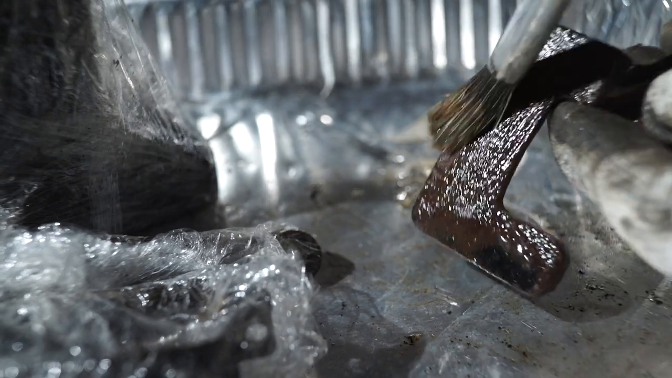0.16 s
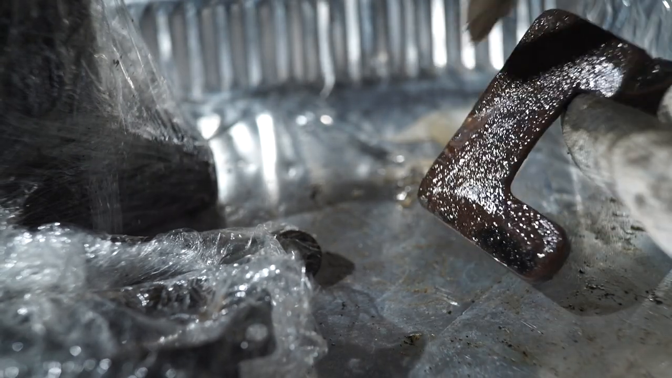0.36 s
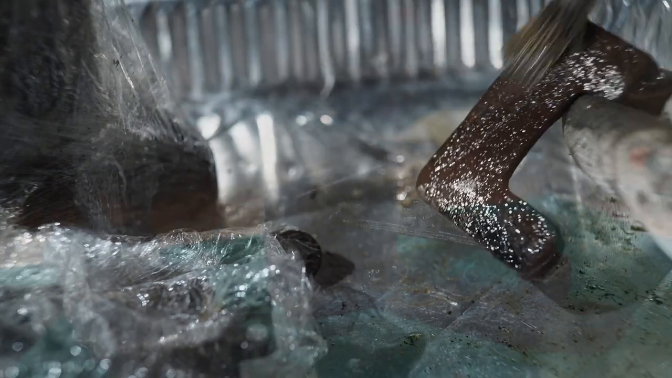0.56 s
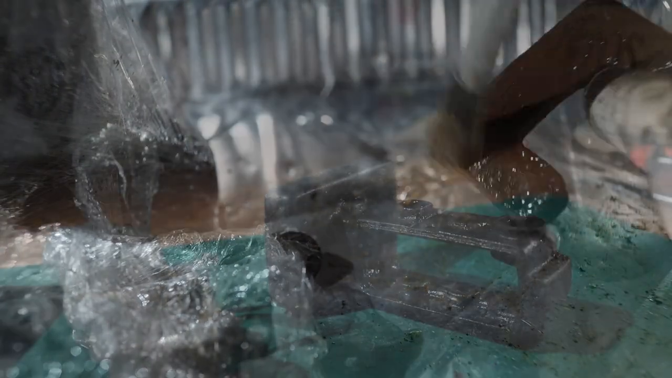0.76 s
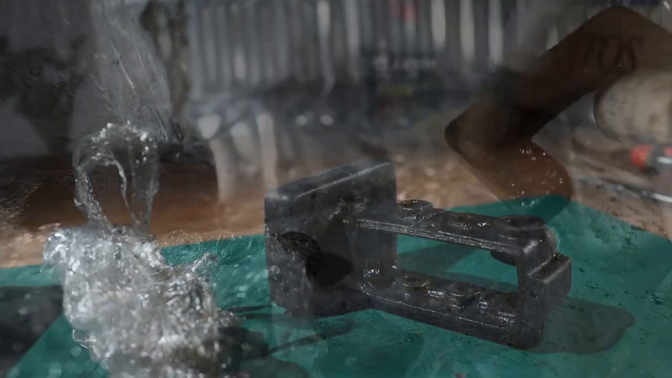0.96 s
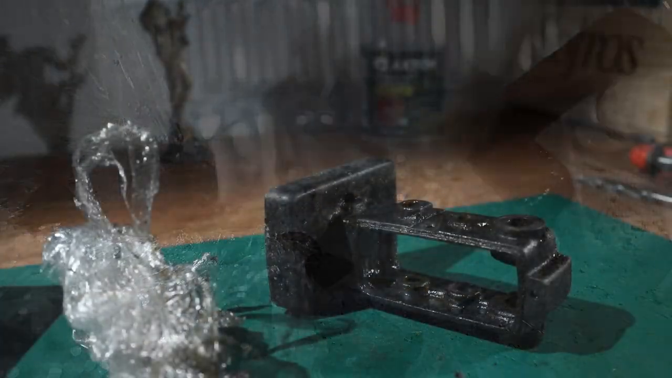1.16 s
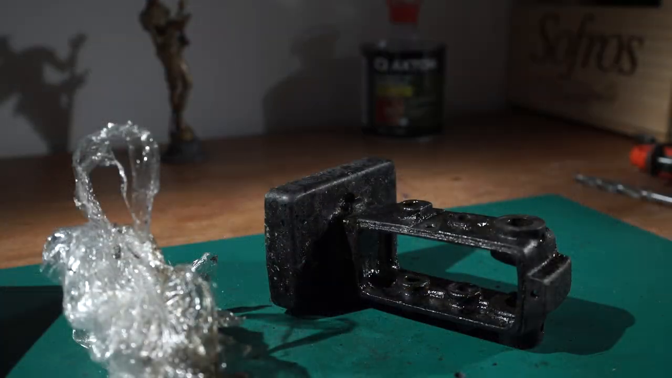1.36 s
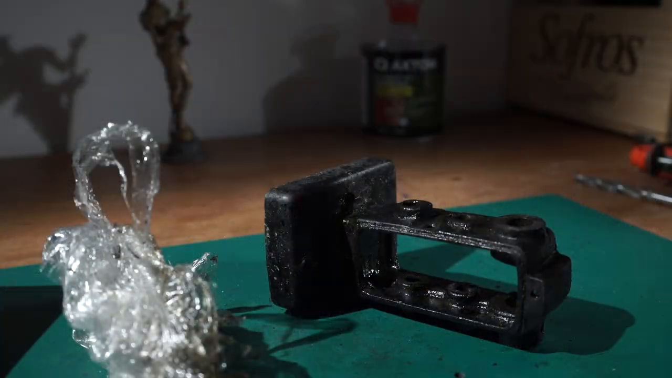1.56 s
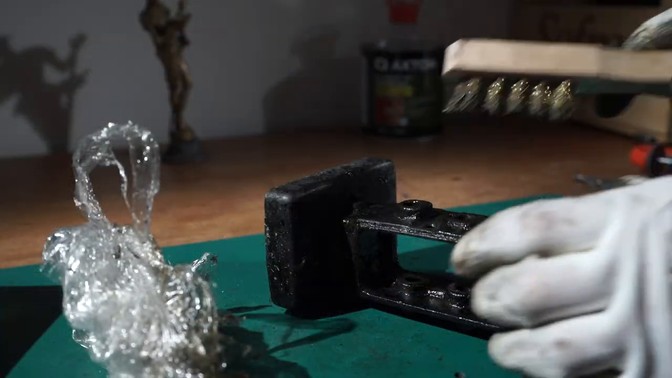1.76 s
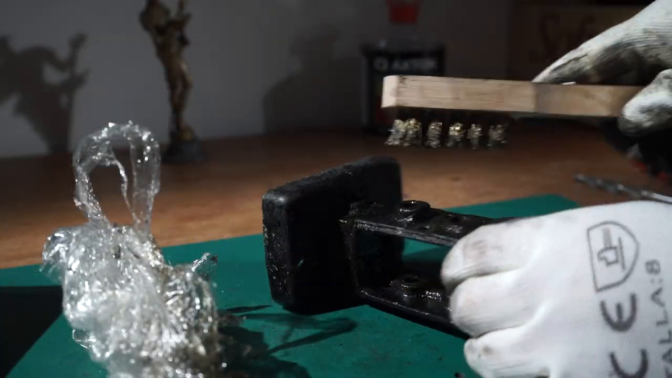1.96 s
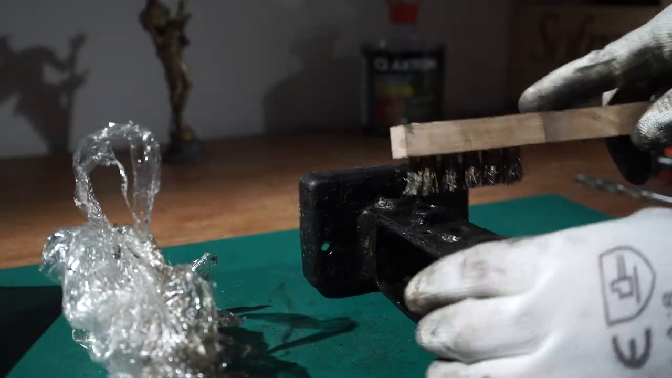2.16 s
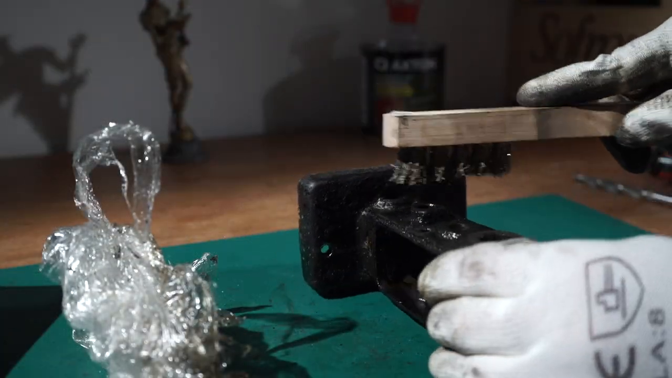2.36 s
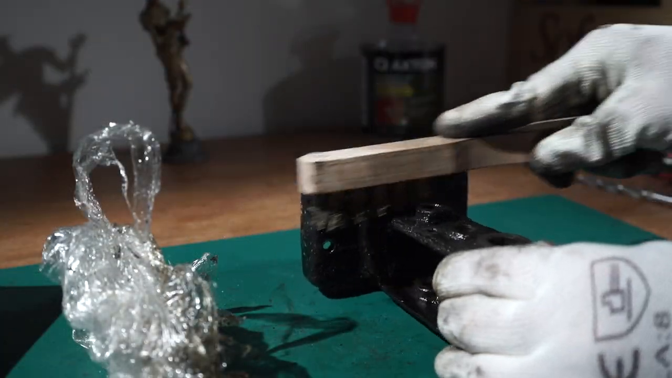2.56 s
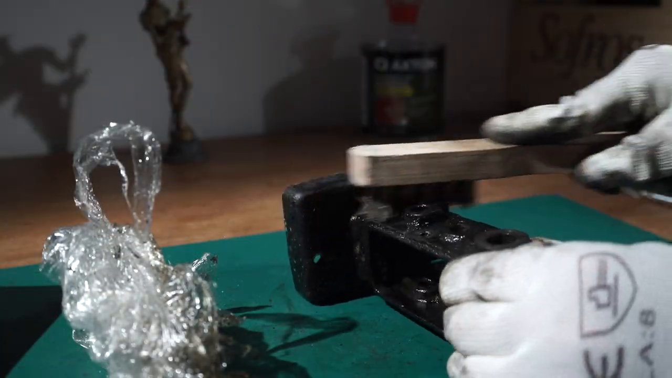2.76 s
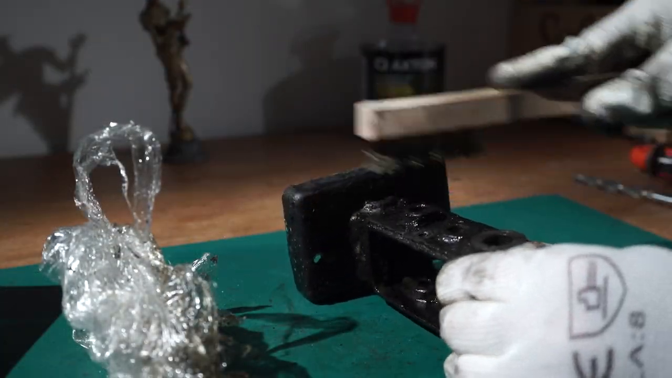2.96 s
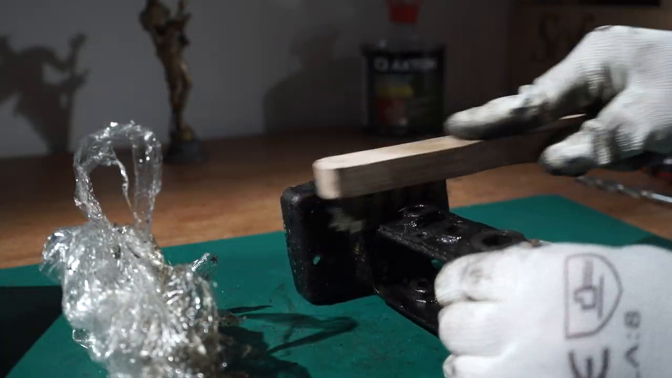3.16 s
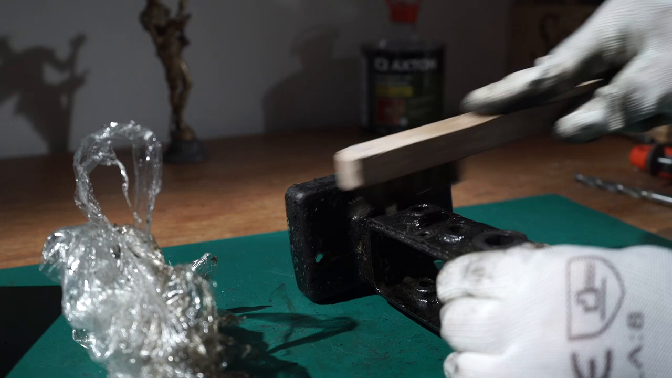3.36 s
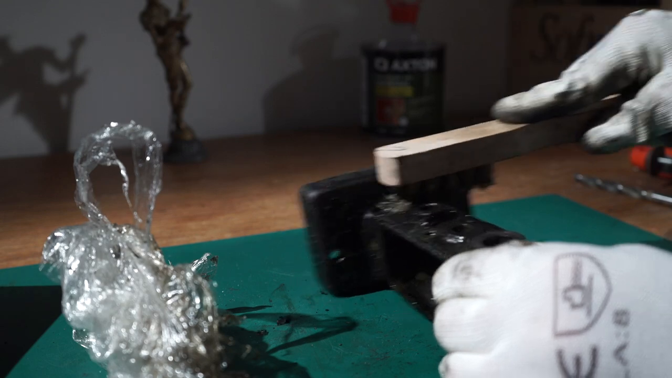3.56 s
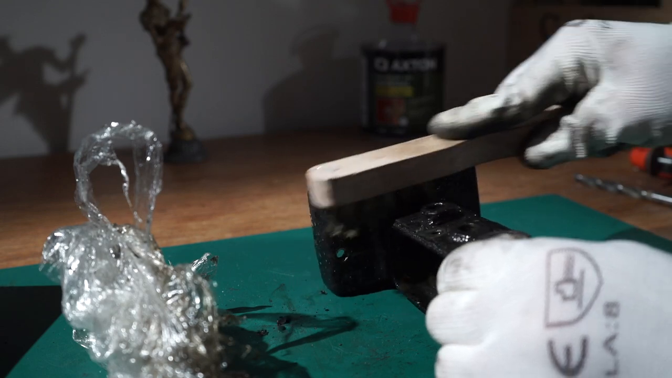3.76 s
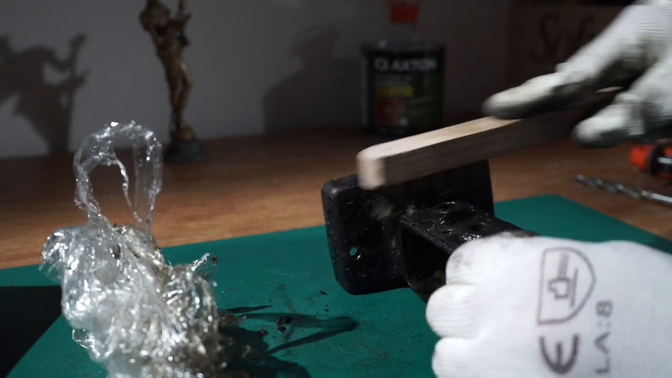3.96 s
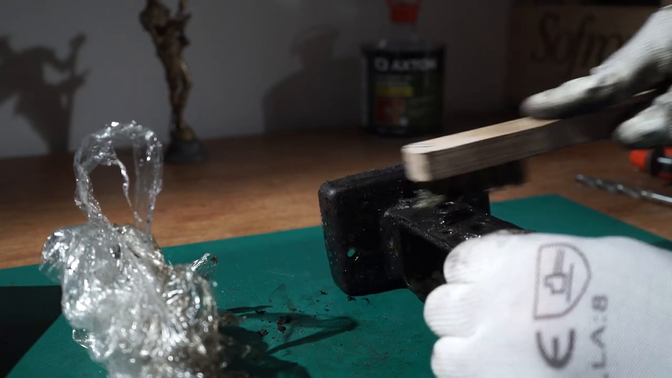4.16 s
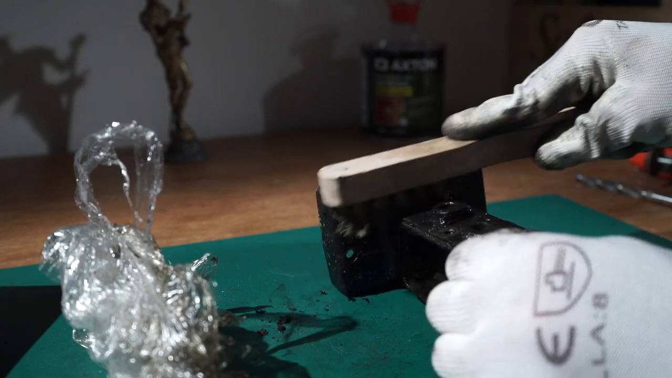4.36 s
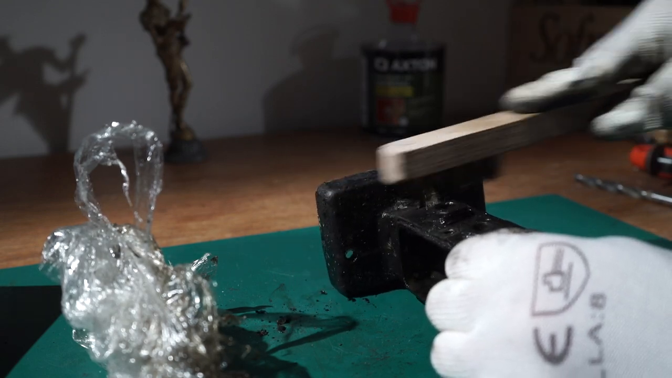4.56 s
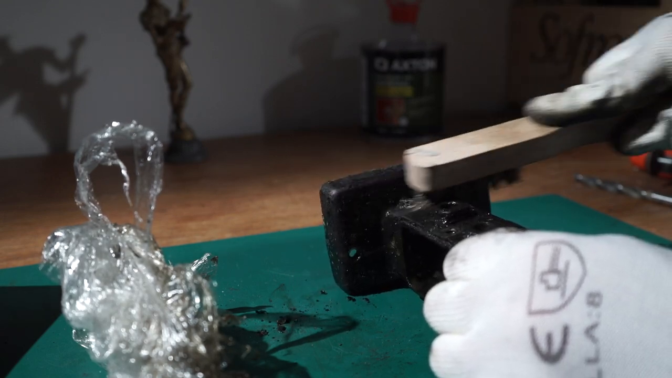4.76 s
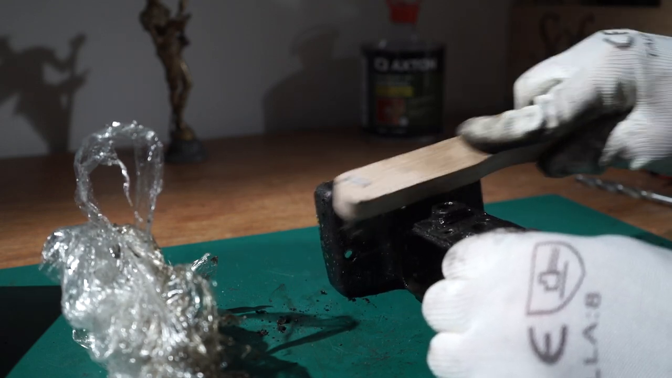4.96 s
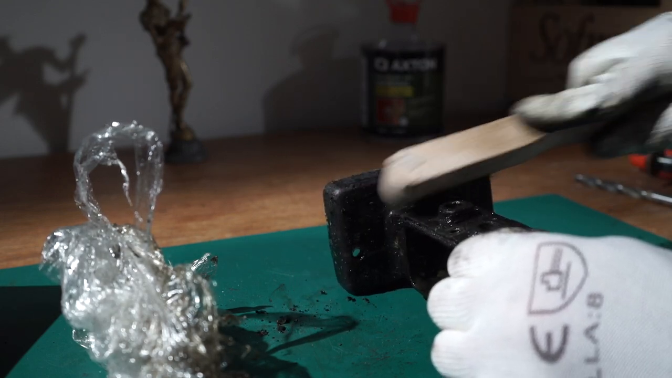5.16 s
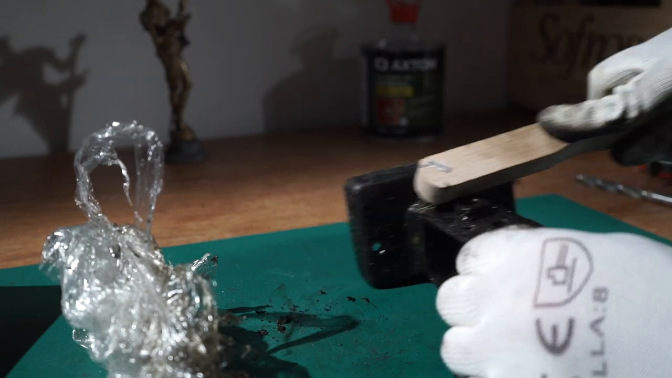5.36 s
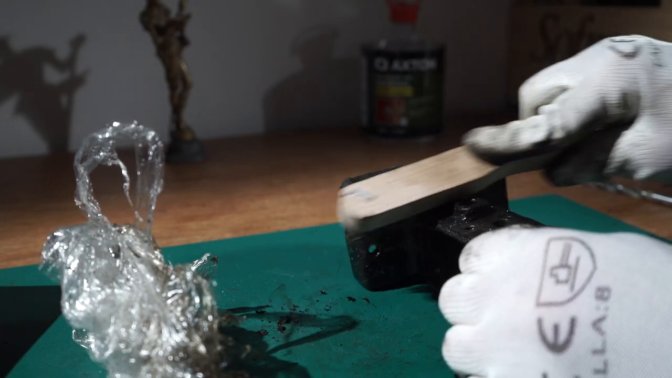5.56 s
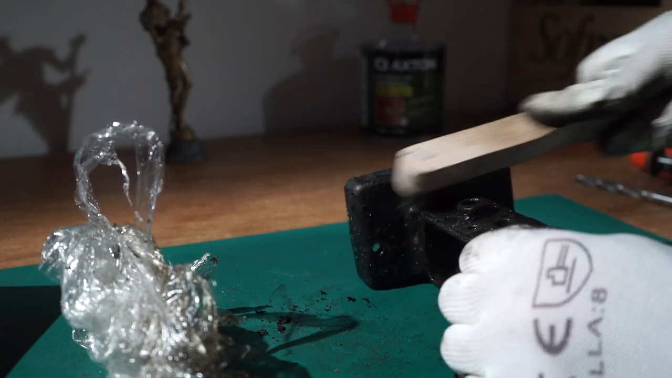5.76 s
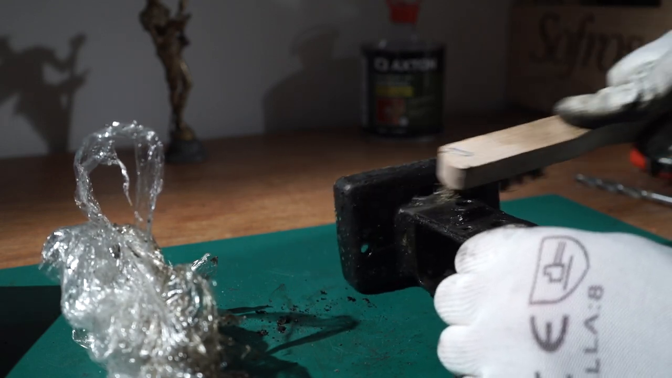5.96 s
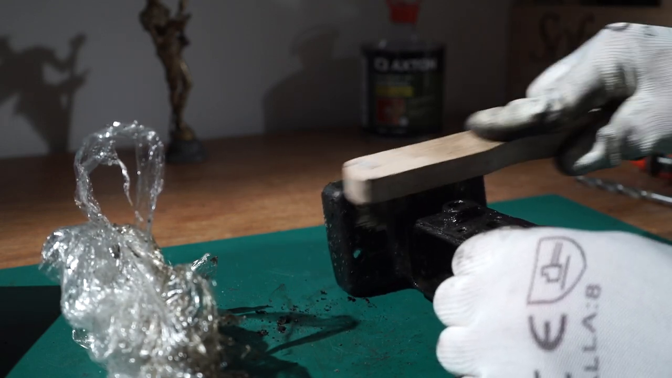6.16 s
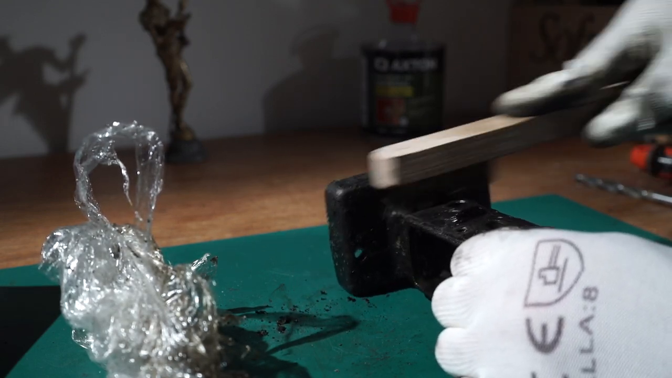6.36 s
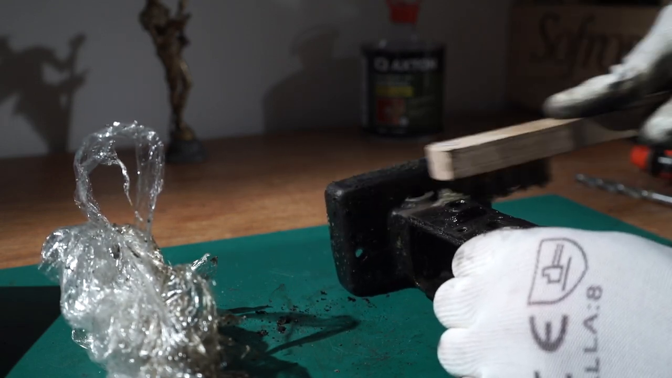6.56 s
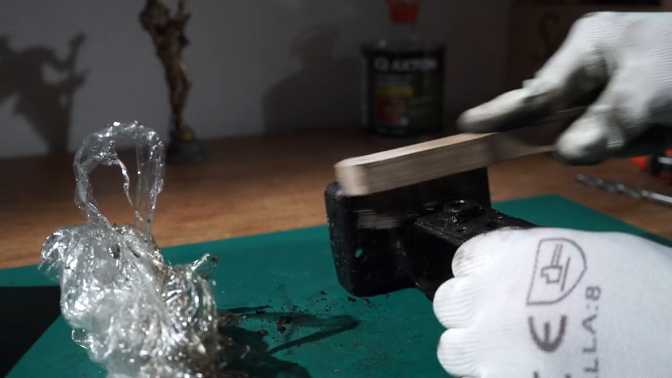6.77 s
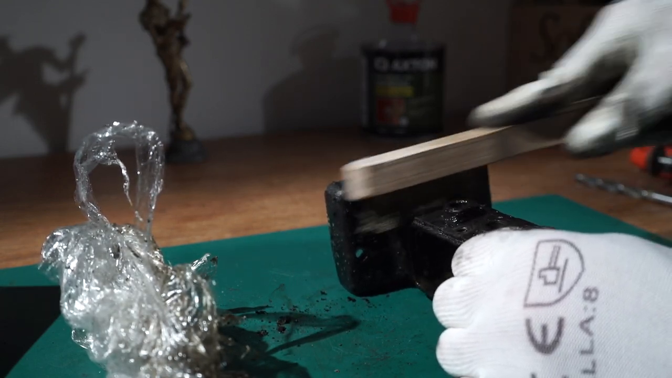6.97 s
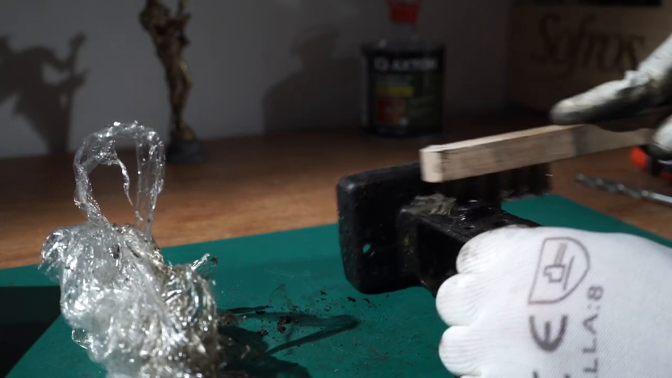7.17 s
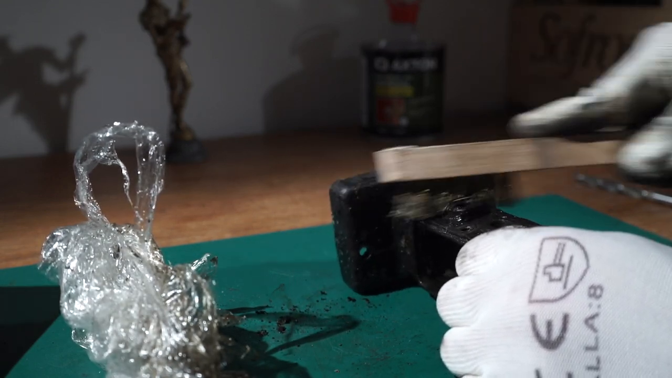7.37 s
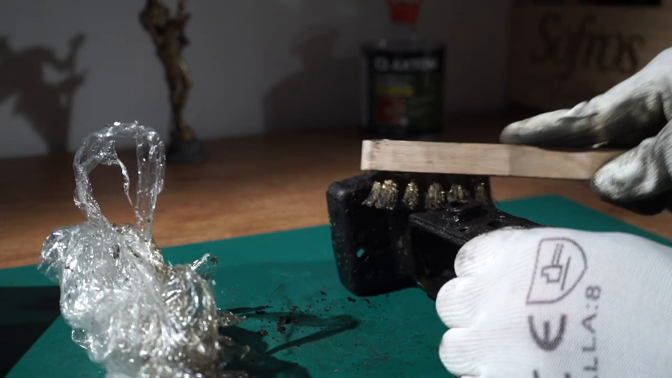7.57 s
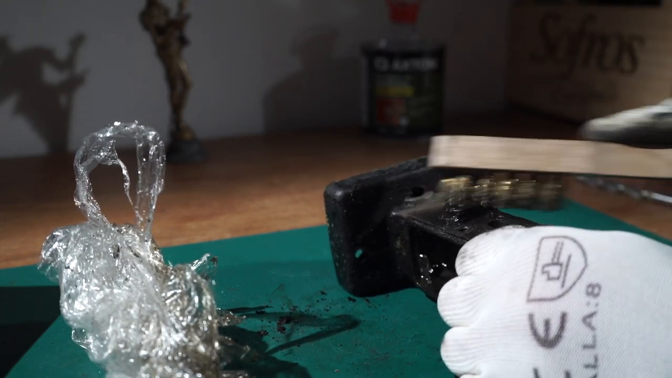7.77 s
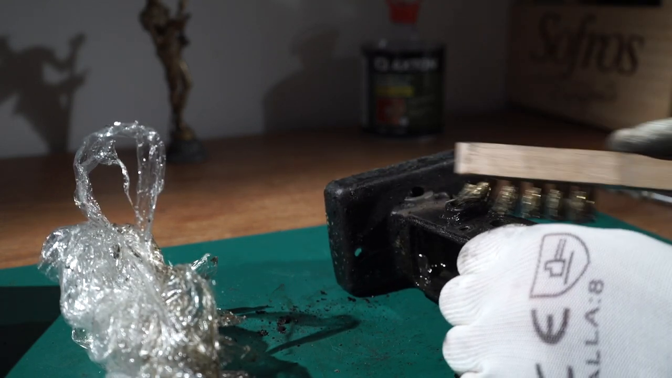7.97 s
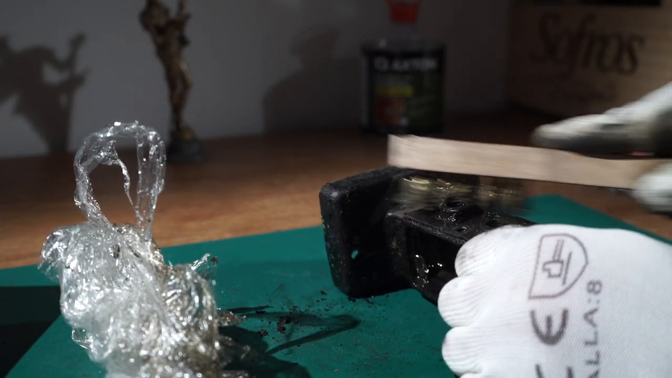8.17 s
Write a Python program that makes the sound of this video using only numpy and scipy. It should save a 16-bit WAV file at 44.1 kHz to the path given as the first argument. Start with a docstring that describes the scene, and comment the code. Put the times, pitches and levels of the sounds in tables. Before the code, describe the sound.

Three faint, soft paintbrush strokes open the sound, followed at about 0.7 seconds by a sharp clack of a wooden handle. Work gloves rustle quietly with small snaps and clicks until about 2.3 seconds, when a metal frame bumps on a workbench. From 2.5 seconds a hand wire brush makes a few light, separate scrapes with a thin ring of wire. At about 3.4 seconds it settles into fast back-and-forth scrubbing, a little over three cycles a second, rasping and hissing, strongest between 4.5 and 6.5 seconds. Throughout the scrubbing the frame rocks, giving irregular dull thumps, a low rumble and brief skids on the mat. The handle knocks against the metal now and then, more often from 7 seconds, as the strokes lighten and the wires ring more, up to the end just after 8 seconds. Everything is close, in a small workshop with a faint hum.

```python
"""Wire brush on a metal frame

A few soft paintbrush strokes, a sharp clack of a wooden handle and rustling work gloves come first.
A hand wire brush then takes paint off a small metal frame: light, separate strokes, then fast scrubs.
Stick-slip friction at the wire tips rasps, hisses and drives the modes of the wires and the frame.
The frame rocks on its workbench, and each landing excites the low modes of the bench as a thump."""
import sys
import numpy as np
from scipy import signal
from scipy.fft import rfft, irfft
from scipy.io import wavfile
from scipy.ndimage import uniform_filter1d

SR = 44100
rng = np.random.default_rng(int(sys.argv[2]) if len(sys.argv) > 2 else 0)


def to_wav(s):
    """Save 16-bit WAV."""
    ch = np.atleast_2d(s).T  # columns
    pcm = np.round(np.clip(ch, -1, 1) * 32767)  # PCM
    wavfile.write(sys.argv[1], SR, pcm.astype(np.int16))


N = 362502
TIME = np.arange(N) / SR

# Friction spectra of scraped paint, bristle tufts and bristle tips: frequency_hz, density_db
PAINT_SPECTRUM = [(300, -7), (600, -13), (1000, 3.5), (1600, 2), (2300, 4.5), (2800, 6), (3400, 6.5),
                  (5000, -25.5)]
TUFT_SPECTRUM = [(1800, -8.5), (2700, -12.5), (3250, -9), (3650, 0), (4100, -5.5), (4600, -10),
                 (5300, -23.5), (6500, -25.5)]
TIP_SPECTRUM = [(3500, -3.5), (5200, -2.5), (6200, -2.5), (7000, -2), (7800, -4), (8900, -1), (10300, -6.5),
                (12000, -2), (14000, -10), (16000, -6.5)]
# Modes of the frame and of wires that flick free past its edge: frequency_hz, level_db, t60_s
FRAME_MODES = [(1288, -1, 0.43), (2250, -1, 0.3), (3733, 10, 0.14), (3853, 9, 0.056), (5040, -6, 0.043),
               (5800, -7, 0.044), (6120, -9, 0.11), (7080, -5.5, 0.028), (9350, -6, 0.11),
               (12357, -29, .07)]
WIRE_MODES = [(1933, -7, .07), (3155, 1.5, .055), (3684, 3, .09), (4630, -12, .08), (5130, -2, .05),
              (5367, 0, .06), (5490, -8, .03), (7052, -7, .035), (8511, -15, .04), (9410, -15, .1),
              (10858, -15, .06), (11773, -16, .07), (12775, -18, .07)]
# Ringing of the wires that overhang the edge: time_s, level_db
OVERHANG = [(0.7, -78), (2.55, -76), (2.8, -47.5), (3.27, -56), (3.45, -54), (5.3, -52), (5.9, -49),
            (6.55, -48), (7.25, -42.5), (7.6, -37), (8.15, -35.5)]

def brush(scrape, rasp, hiss, sweep, bend=0.042):
    """Stick-slip friction: bristle tips catch and release, radiating noise and driving resonances."""
    # whole tufts let go together, so a fast judder and a slower sway modulate the slips
    grip = unit(amp(2 * wander(140) + 1.03 * wander(18.6)))
    slips = impulses(per_s=14000, spread_db=2) * grip
    # the tufts sound lower or higher as the hand bends them more or less
    lean = np.pi / 4 * (1 + np.tanh(wander(3.2)))
    slack, taut = (
        colour(impulses(per_s=13000, spread_db=2) * grip, np.multiply(TUFT_SPECTRUM, [shift, 1]))
        for shift in (1 - bend, 1 + bend))
    tufts = amp(-1) * rasp * (np.cos(lean) * slack + np.sin(lean) * taut)
    paint = amp(-3.15) * scrape * colour(slips, PAINT_SPECTRUM)
    tips = amp(-4) * hiss * colour(slips, TIP_SPECTRUM)
    frame = resonate((amp(-13) * rasp + amp(-9) * scrape) * slips, FRAME_MODES)
    overhang = sweep * amp(np.interp(TIME, *np.transpose(OVERHANG)))
    wires = resonate(overhang * impulses(per_s=3800, spread_db=3.5), WIRE_MODES)
    return paint + tufts + tips + frame + wires


# Fast push-pull cycles, each lasting until the next: start_s, push_db, pull_db, extra_hiss_db
SCRUB_CYCLES = [(3.361, -38.5, -41.5, -5.5), (3.645, -36, -38.5, -3), (3.965, -40, -38.5, -1.5),
                (4.276, -34, -38, -1), (4.572, -32.5, -37, -2.5), (4.868, -31, -34.5, -3),
                (5.168, -32.5, -34.5, -3), (5.461, -32, -32.5, -1), (5.772, -35, -35.5, -1.5),
                (6.067, -33, -39, -1), (6.363, -33.5, -39.5, -0.5), (6.659, -36.5, -39, 0),
                (6.95, -35.5, -41, 1), (7.23, -42.5, -38, .5), (7.516, -42.5, -37.5, -1.5),
                (7.802, -45.5, -43.5, -0.5), (8.062, -42, -68, 1)]

def scrub_strokes(push_peak=0.6, pull_peak=0.4):
    """Reciprocating motion: two equal strokes a cycle, each fastest at its peak share of the length."""
    periods = np.diff([row[0] for row in SCRUB_CYCLES])
    strokes = []
    for (start, push_db, pull_db, hiss_db), period in zip(SCRUB_CYCLES, [*periods, periods[-1]]):
        length = period / 2
        strokes.append((start, length, push_peak, push_db, hiss_db))
        strokes.append((start + length, length, pull_peak, pull_db, hiss_db))
    return strokes


# Three soft paintbrush strokes, then light, separate strokes of the wire brush:
# start_s, length_s, force_db, extra_hiss_db
PAINTBRUSH_AND_WIRE_STROKES = [(-0.09, 0.15, -52, -13), (0.192, 0.14, -55, -5), (0.507, 0.15, -54.5, -3),
                               (2.45, 0.3, -56, -1.5), (2.678, 0.29, -45.5, -1), (3.108, 0.048, -49.5, -3),
                               (3.167, 0.18, -43, -1.5)]

def friction_envelopes(turn_speed=0.09, give=0.63):
    """Friction noise grows as a power of sliding speed; at each turn the bristles fall nearly quiet."""
    separate = [(start, length, 0.5, *levels) for start, length, *levels in PAINTBRUSH_AND_WIRE_STROKES]
    power = np.zeros((4, N))
    for start, length, peak, force_db, extra_hiss_db in separate + scrub_strokes():
        progress = np.interp(TIME, [start, start + length * peak, start + length], [0, 0.5, 1])
        during = (progress > 0) & (progress < 1)
        speed = np.maximum(np.sin(np.pi * progress[during]) - turn_speed, 0)
        drag = unit(0.18 + speed ** 0.98)
        sweep = unit(0.18 + speed ** 1.9)
        slide = unit(0.1 + speed ** 1.47)
        # scrape and hiss grow less with force once all the bristles touch
        scrape_db, hiss_db = (force_db - give * max(force_db - knee_db, 0) for knee_db in (-45, -43))
        scrape = amp(scrape_db) * drag
        rasp = amp(force_db) * sweep
        hiss = amp(hiss_db + extra_hiss_db) * slide
        power[:, during] += np.square([scrape, rasp, hiss, sweep])
    return np.sqrt(abs(uniform_filter1d(power, size=200, axis=1)))


# Modes of the wooden handle: frequency_hz, level_db, t60_s
HANDLE_MODES = [(448, -13.5, 0.04), (707, -18.5, 0.054), (1121, -15.5, 0.032), (1364, -12, 0.038),
                (1800, 2, 0.0035), (2360, -12, 0.05), (2630, -5, 0.012), (2920, 3.5, 0.0044),
                (3260, -5, 0.017), (3500, -4.5, 0.021), (3696, -0.5, 0.019), (4850, -22, 0.016),
                (6100, -32, .015)]
# The handle strikes, first twice on a foil tray, then on the frame, driving it onto the bench: start_s,
# clack_db, contact_ms, thump_db
HANDLE_STRIKES = [(0.722, -13.5, 0.037, -37), (.852, -37, 0.21, -47), (2.354, -28, 1, -15),
                  (3.442, -25.5, 0.98, -7), (4.613, -23, 0.63, -9.5), (6.132, -25, 0.098, -6),
                  (6.96, -29, 0.97, -14), (7.028, -21.5, 0.29, -18.5), (7.246, -23.5, 0.52, -6),
                  (7.308, -21.5, 0.44, -17.5), (7.807, -19.5, 1, -9), (7.864, -19, 1, -22),
                  (8.077, -24.5, 0.94, -10.5), (8.126, -16, 0.84, -14.5)]

def handle_clacks(crack_s=0.0042):
    """Impact of wood on metal: a crack and free vibration, low-passed more by a longer contact."""
    out, t = np.zeros(N), np.arange(SR // 2) / SR
    polarity = (-1) ** np.arange(len(HANDLE_MODES))
    for start, db, contact_ms, _ in HANDLE_STRIKES:
        gains = polarity * amp(rng.standard_normal(len(HANDLE_MODES)))
        noise = signal.lfilter(*signal.butter(3, 4200, fs=SR), rng.standard_normal(len(t)))
        clack = ring(HANDLE_MODES, gains) + 0.54 * noise * np.exp(-t / crack_s)
        pole = np.exp(-1000 * np.pi / (contact_ms * SR))
        clack = signal.lfilter([1], np.poly([pole, pole]), clack)
        add(out, start, amp(db) * clack / clack[:SR // 200].std())
    return out


# Modes of the bench top, damped by the mat and the hand: frequency_hz, level_db, t60_s
BENCH_MODES = [(59.7, -5, 0.63), (79.5, 5, 0.42), (88.55, 8.5, 0.15), (106.6, 7, 0.28), (131, -4.5, 0.11),
               (153, 2, 0.28), (206.8, 0.5, 0.12), (237, -4.5, 0.13), (277.5, -11, 0.38),
               (293.7, -6.5, 0.11), (331, -18, 0.13), (395, -14.5, 0.02), (431, -16, 0.026),
               (513, -53, .04), (554, -21.5, 0.056), (700, -47, .05)]
# Dragged by hand or bristles, the frame tips and drops back: start_s, level_db, dullness_db
LANDINGS = [(0.992, -44, -16), (2.048, -23.5, 9), (2.088, -29.5, -4), (2.545, -20.5, 33), (3.143, -7, 26),
            (3.583, -11.5, 2.5), (4.049, -19.5, 17), (4.323, -24, -5), (4.997, -11.5, 6.5),
            (5.114, -14, -6.5), (5.273, -16.5, 31), (5.426, -13, -5.5), (5.736, -10, 16), (6.435, -9.5, -1),
            (6.738, -16.5, -5), (7.008, -16, -3)]

def bench_thumps(blow_ms=2.33, lift_ms=5, chatter_s=0.029, knee_hz=270, fall_s=0.00512):
    """Impact excitation: the frame lands and chatters; harder contact wakes more upper bench modes."""
    hz, db, t60 = np.transpose(BENCH_MODES)
    upper = 1 / (1 + (knee_hz / hz) ** 4)
    t = np.arange(-SR // 100, SR // 6) / SR
    attack = abs(t - 1 / 200) < 1 / 120
    # the load on the bench eases briefly just before the blow
    lift = np.exp(-(2000 * t / lift_ms + 1) ** 2)
    blow = np.exp(-(2000 * t / blow_ms) ** 2)
    force = blow / blow.sum() - 0.74 * lift / lift.sum()
    settling = 0.42 * (t > 0) * np.exp(-abs(t) / chatter_s)
    struck = [(start + fall_s, thump_db, 0) for start, _, _, thump_db in HANDLE_STRIKES]
    out = np.zeros(N)
    for start, level_db, dullness_db in struck + LANDINGS + rocking():
        # each landing is on another spot under another grip, which shifts the modes
        shifted_hz = hz * (1 + 0.05 * rng.standard_normal(len(hz)))
        shifted_db = db + 1.5 * rng.standard_normal(len(hz))
        modes = np.transpose([shifted_hz, shifted_db, t60])
        gains = amp((9 - dullness_db) * upper)
        chatter = settling * rng.standard_normal(len(t)) * (rng.random(len(t)) < 600 / SR)
        thump = signal.fftconvolve(force, ring(modes, gains, np.cos))
        thump += signal.fftconvolve(chatter, ring(modes, gains * np.sqrt(upper)))
        add(out, start + t[0], amp(level_db - 0.5) * thump / thump[:len(t)][attack].std())
    return out


def rocking(usual_force_db=-37, jitter_s=0.01597):
    """Friction tips the frame: one small landing near the peak speed of every fast stroke."""
    landings = []
    for start, length, peak, force_db, _ in scrub_strokes():
        lateness, strength, spot = rng.uniform(-1.005, 1, 3)
        level_db = -25 + 0.54 * (force_db - usual_force_db) + 2 * strength
        dullness_db = 14 * abs(spot)
        landings.append((start + length * peak + jitter_s * lateness, level_db, dullness_db))
    return landings


# How freely the held frame shakes under the brush: time_s, level_db
LOOSENESS = [(1.9, -27), (2.45, 0), (2.9, -2), (3.3, -3.5), (4.2, 2), (6.6, -2.5), (7.4, 3), (8.2, 2)]

def bench_rumble(scrape, knee_hz=220, mat_cutoff_hz=550):
    """Forced vibration: the brushed frame shakes the bench top through the soft mat, a low-pass."""
    looseness = amp(11 + np.interp(TIME, *np.transpose(LOOSENESS)))
    shake = impulses(per_s=900, spread_db=-2) * looseness * uniform_filter1d(scrape, size=SR // 16)
    upper = np.transpose(BENCH_MODES)[0] > knee_hz
    response = ring(BENCH_MODES, amp(-2 * upper), np.cos)
    return convolve(shake, signal.lfilter(*signal.butter(2, mat_cutoff_hz, fs=SR), response))


# The frame skids on the mat: peak_s, half_length_s, level_db
SKIDS = [(3.48, 0.037, -39), (4.069, 0.026, -33), (4.362, 0.043, -32), (4.659, 0.039, -29),
         (5.42, 0.012, -31), (5.882, 0.047, -38), (6.143, 0.013, -22), (7.308, 0.041, -26.5),
         (8.131, 0.045, -28)]
# Spectrum of its judder: frequency_hz, density_db
JUDDER_SPECTRUM = [(150, -21), (230, 6.5), (450, 9.5), (580, -2), (720, -4), (900, -23.5), (1300, -55)]

def frame_skids():
    """Stick-slip of iron on the mat gives short, low grunts."""
    envelope = sum(swell(*skid, steepness=6) for skid in SKIDS)
    return envelope * colour(impulses(per_s=1300, spread_db=2), JUDDER_SPECTRUM)


# One wire catches on the edge in the slow wire brush strokes: peak_s, half_length_s, level_db
WIRE_CATCHES = [(2.566, 0.05, -65), (2.84, 0.051, -44), (3.294, 0.038, -50)]

def singing_wire(pitch_hz=5420, t60_s=0.12):
    """Resonance: a single wire, plucked over and over, rings at its natural frequency."""
    envelope = sum(swell(*catch) for catch in WIRE_CATCHES)
    return resonate(envelope * impulses(per_s=1800, spread_db=4), [(pitch_hz, 0, t60_s)])


# Gloves and single wires snap: start_s, level_db, pitch_hz
SNAPS = [(1.049, -54, 3000), (1.066, -48, 3630), (1.220, -40.5, 4460), (1.252, -38, 3060),
         (1.42, -45, 2000), (1.739, -37, 2480), (1.855, -45, 2140), (2.046, -35.5, 3080),
         (2.545, -40.5, 4030), (3.136, -40, 1990), (3.395, -44, 3600), (4.146, -35, 3800),
         (5.35, -40, 3800), (7.544, -35, 3120)]

def snaps(decay_s=0.003):
    """Damped transients: each snap is a noise burst in one broad resonance."""
    out, t = np.zeros(N), np.arange(SR // 20) / SR
    for start, db, hz in SNAPS:
        band = signal.butter(2, [hz * 0.6, hz * 1.4], "band", fs=SR, output="sos")
        snap = signal.sosfilt(band, rng.standard_normal(len(t)) * np.exp(-t / decay_s))
        add(out, start, amp(db - 1) * snap / snap[:SR // 250].std())
    return out


# Friction spectrum of coated cloth: frequency_hz, density_db
CLOTH_SPECTRUM = [(250, 14), (600, 13), (1100, 5), (1600, 4), (2200, 4.5), (3000, 3), (3800, 5), (4600, -5),
                  (6500, -12), (9000, -22), (15000, -35)]
# The gloves rub as frame and brush are taken up: peak_s, half_length_s, level_db, low_cut_hz
GLOVE_RUBS = [(0.017, 0.25, -53, 500), (0.692, 0.017, -55, 400), (0.833, 0.11, -54.5, 400),
              (1.071, 0.014, -44, 1200), (1.134, 0.018, -51, 990), (1.234, 0.041, -52.5, 1040),
              (1.434, 0.031, -50, 720), (1.507, 0.027, -41, 1150), (1.582, 0.026, -45, 1310),
              (1.715, 0.063, -52, 1350), (1.8, 0.027, -43.5, 1400), (1.95, 0.052, -49.5, 1250),
              (2.08, 0.093, -45.5, 490), (2.305, 0.09, -49.5, 725)]

def gloves():
    """Sliding friction: coated cloth rustles in soft clumps of tiny slips."""
    cloth = colour(impulses(per_s=6000, spread_db=-3) * amp(2 * wander(43)), CLOTH_SPECTRUM)
    out = np.zeros(N)
    for peak_s, half_length_s, db, low_cut_hz in GLOVE_RUBS:
        highpass = signal.butter(5, low_cut_hz, "high", fs=SR, output="sos")
        out += swell(peak_s, half_length_s, db) * unit(signal.sosfilt(highpass, cloth))
    return out


# Reverberation time of the small workshop: frequency_hz, t60_s
ROOM_DECAY = [(100, 0.95), (500, 0.35), (2000, 0.32), (3200, 0.28), (3750, 0.28), (4400, 0.18),
              (6000, 0.31), (14000, 0.13)]

def reverberation(x, gap_s=0.0024):
    """Sparse reflections decay exponentially, each band at its own rate."""
    n = SR // 2
    reflections = rng.choice([-1., 1.], n) * (rng.random(n) < 0.08) * (np.arange(n) > gap_s * SR)
    hz, t, bands = signal.stft(reflections, SR, nperseg=256)
    decay = np.exp(-np.log(1000) * t / value_at(ROOM_DECAY, hz)[:, None])
    return convolve(x, signal.istft(bands * decay, SR, nperseg=256)[1])


# Background noise of the room: frequency_hz, density_db
AIR_SPECTRUM = [(20, 9), (45, -3.5), (70, -5.5), (105, -3.5), (165, -14.5), (400, -16), (750, -21),
                (1100, -28.5), (3600, -27), (5500, -36.5), (10000, -40.5), (16000, -41)]

def room_tone(air_db=-51, hum_db=-54.5, hum_hz=99.3):
    """The noise floor: broadband air noise and a faint sinusoidal mains hum."""
    air = amp(air_db) * colour(rng.standard_normal(N), AIR_SPECTRUM)
    return air + amp(hum_db) * unit(np.sin(2 * np.pi * hum_hz * TIME))


def amp(db):
    """Decibels to amplitude ratio."""
    return 10 ** (np.asarray(db) / 20)


def unit(x):
    """Normalisation to rms 1."""
    return x / np.sqrt(np.mean(x ** 2) + 1e-20)


def value_at(table, hz):
    """Interpolation on a log-frequency axis."""
    table_hz, values = np.transpose(table)
    return np.interp(np.log(hz + 1), np.log(table_hz + 1), values)


def colour(x, spectrum):
    """Spectral shaping, with a roll-off beyond the ends of the table; rms 1."""
    hz = np.fft.rfftfreq(N, 1 / SR)
    low_cut = 1 / (1 + (spectrum[0][0] / (hz + 1)) ** 4)
    high_cut = 1 / (1 + (hz / spectrum[-1][0] / 2) ** 4)
    return unit(irfft(rfft(x) * amp(value_at(spectrum, hz)) * low_cut * high_cut, N))


def wander(bandwidth_hz):
    """Random modulation: low-passed Gaussian noise of rms 1."""
    hz = np.fft.rfftfreq(N, 1 / SR)
    return unit(irfft(rfft(rng.standard_normal(N)) * np.exp(-(hz / bandwidth_hz) ** 2), N))


def impulses(per_s, spread_db):
    """Shot noise: tiny slips of uneven size at random times; rms 1."""
    sizes = amp(spread_db * np.minimum(rng.exponential(1, N), 5))
    return unit(sizes * rng.standard_normal(N) * (rng.random(N) < per_s / SR))


def swell(peak_s, half_length_s, db, steepness=4):
    """A bell-shaped amplitude envelope."""
    return amp(db) / (1 + ((TIME - peak_s) / half_length_s) ** steepness)


def add(mix, start_s, sound):
    """Superposition of a sound onto the mix."""
    part = mix[max(round(start_s * SR), 0):][:len(sound)]
    part += sound[:len(part)]


def ring(modes, gains, wave=np.sin):
    """Free vibration: a sum of exponentially decaying modes."""
    hz, db, t60 = np.transpose(modes)[:, :, None]
    t = np.arange(SR // 2) / SR
    decay = np.exp(-np.log(1000) * t / t60)
    return (np.reshape(gains, (-1, 1)) * amp(db) * decay * wave(2 * np.pi * hz * t)).sum(0)


def resonate(x, modes):
    """Forced vibration: steadily driven modes sound at their listed relative levels."""
    t60 = np.transpose(modes)[2]
    return convolve(x, ring(modes, 1 / np.sqrt(t60)))


def convolve(x, response):
    """Linear filtering by an impulse response scaled to unit energy."""
    return signal.oaconvolve(x, response / np.linalg.norm(response))[:N]


def scene():
    """Superposition of close direct sound, weak reverberation and the noise floor."""
    scrape, rasp, hiss, sweep = friction_envelopes()
    rubbing = brush(scrape, rasp, hiss, sweep) + singing_wire() + gloves()
    knocks = handle_clacks() + snaps()
    bench = bench_thumps() + bench_rumble(scrape) + frame_skids()
    reflected = reverberation(amp(-15) * rubbing + amp(-14) * knocks + amp(-17) * bench)
    return (rubbing + knocks + bench + reflected + room_tone())[None]


def record(dry, cutoff_hz=15830):
    """Hard clipping of any peak beyond full scale, then a low-pass band limit."""
    lowpass = signal.firwin(511, cutoff_hz, window=("kaiser", 9), fs=SR)
    return signal.oaconvolve(np.clip(dry, -1, 1), lowpass[None], "same")


dry = scene()
out = record(dry)
to_wav(out)
```